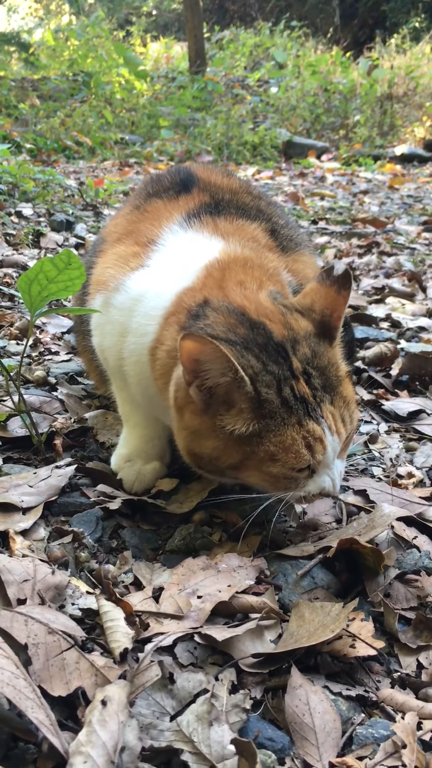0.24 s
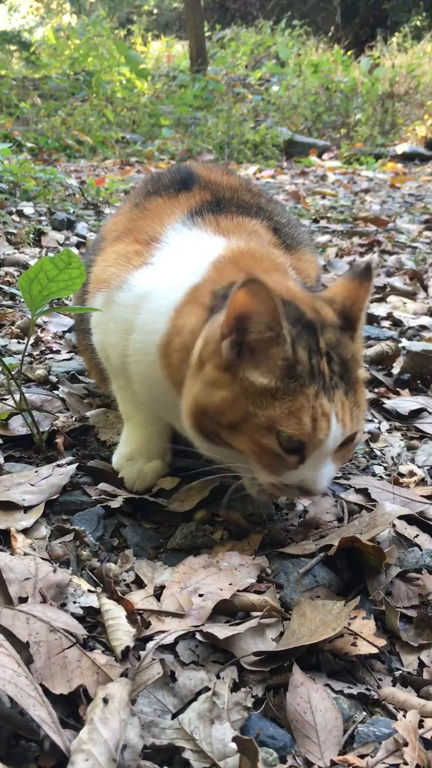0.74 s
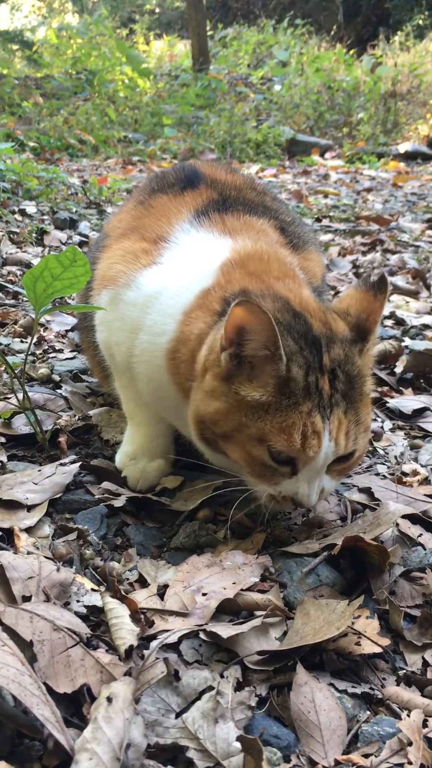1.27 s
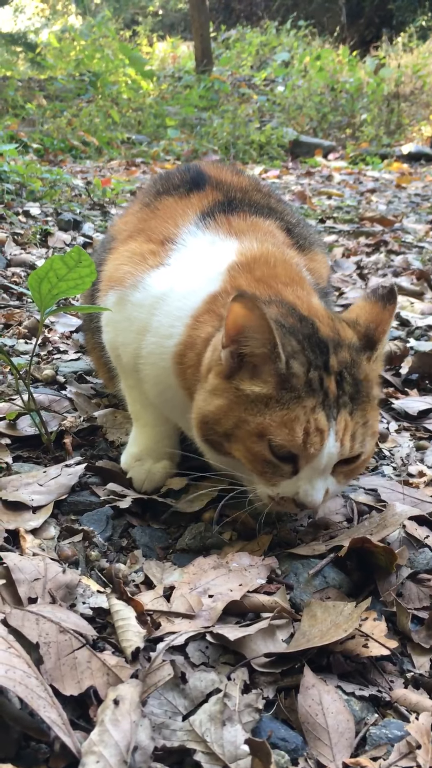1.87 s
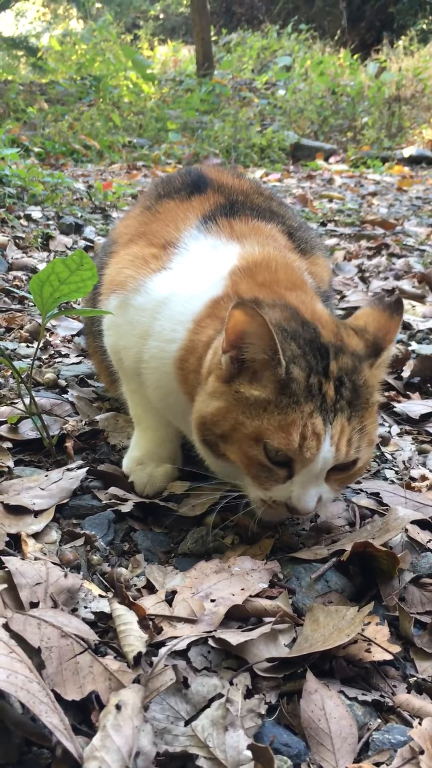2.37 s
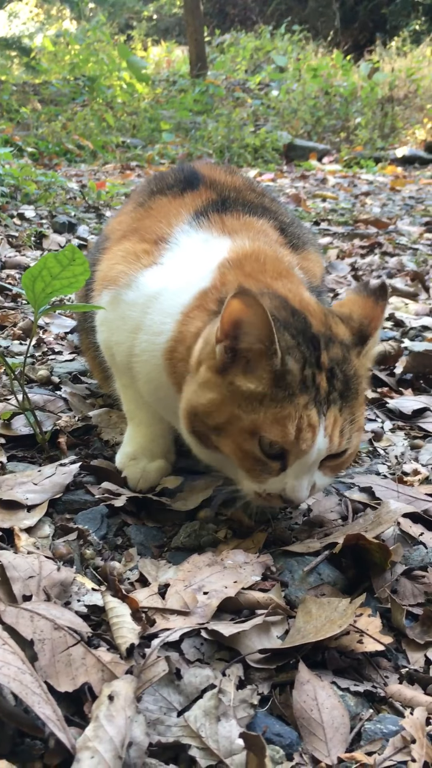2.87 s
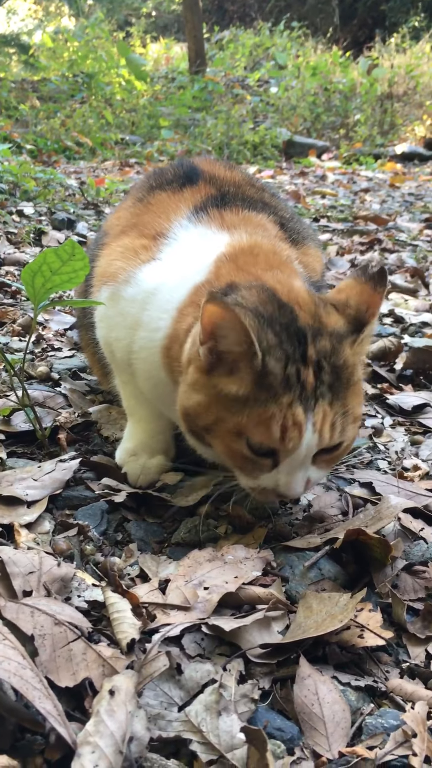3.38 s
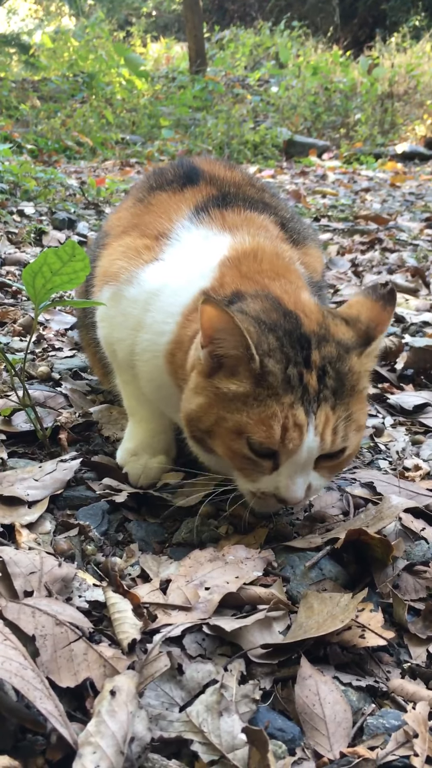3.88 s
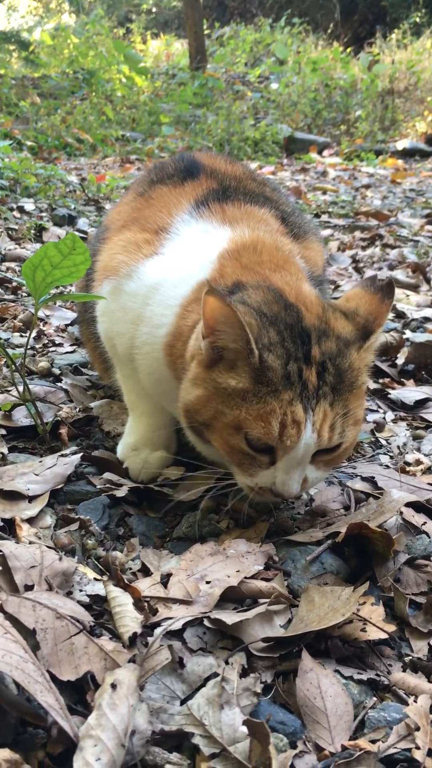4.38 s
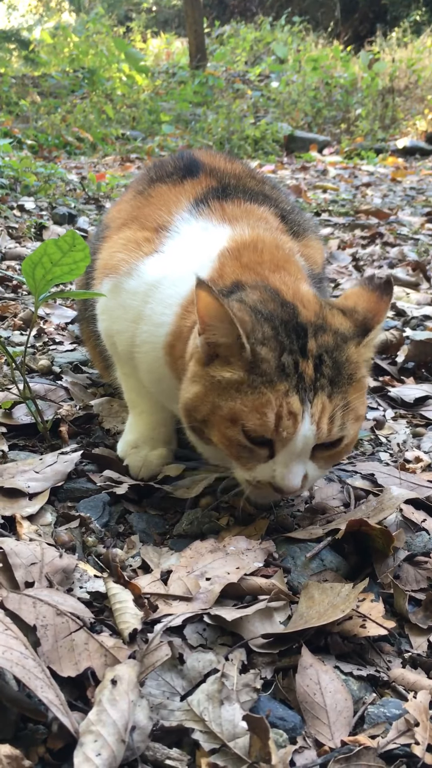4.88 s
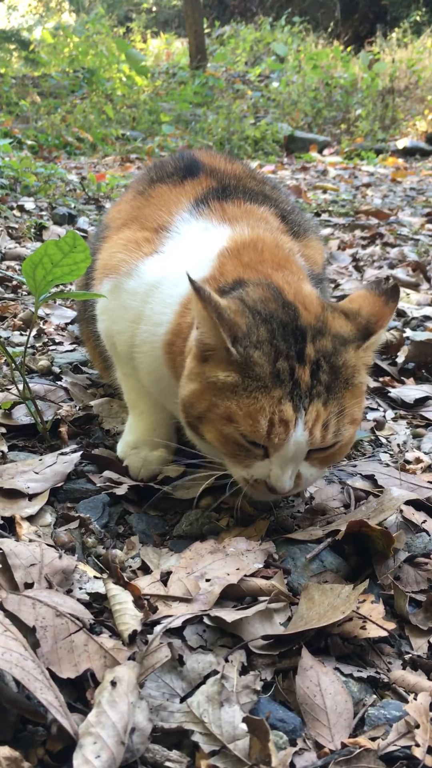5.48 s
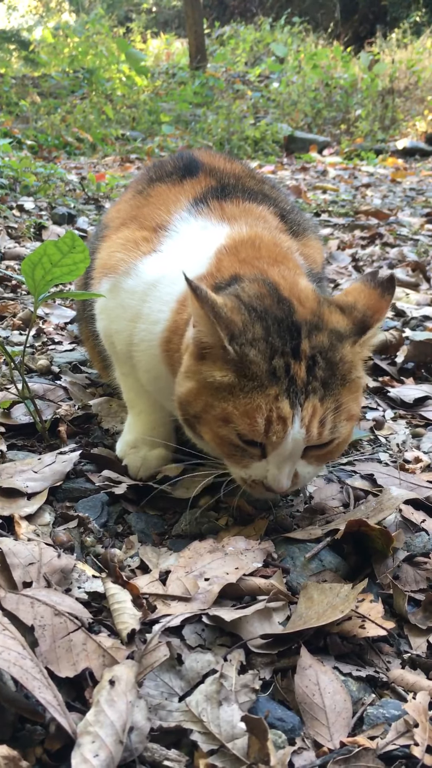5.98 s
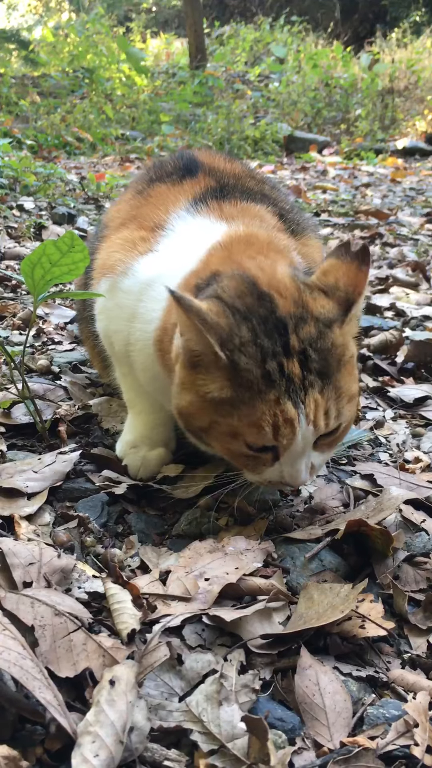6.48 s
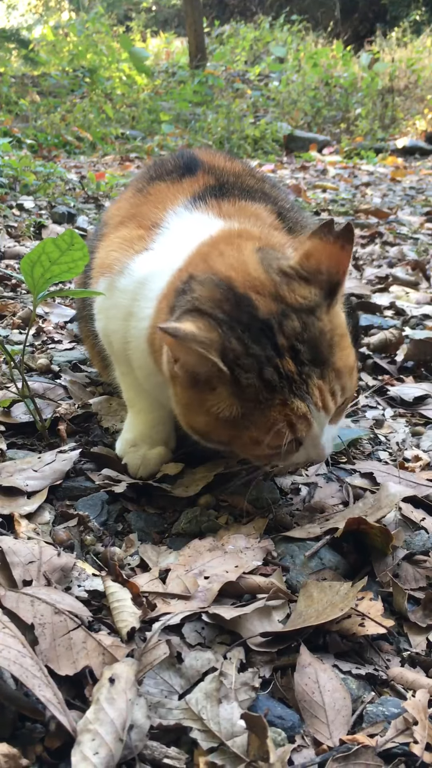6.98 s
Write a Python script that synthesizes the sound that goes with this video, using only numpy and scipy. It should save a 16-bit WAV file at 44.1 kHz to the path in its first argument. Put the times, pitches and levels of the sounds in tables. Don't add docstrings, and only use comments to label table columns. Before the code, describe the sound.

Close, crisp crunching of fish bones in a cat's teeth, with tiny ticks, wet pops, faint hiss and one distant wooden knock.

```python
import sys
import numpy as np
from scipy import signal
from scipy.fft import rfft, irfft
from scipy.io import wavfile

SR = 44100
rng = np.random.default_rng(int(sys.argv[2]) if len(sys.argv) > 2 else 0)


def rack_gain(trim_db):
    fader = np.asarray(trim_db, float)
    return 10 ** (fader / 20)


def dump(signal):
    limited = np.clip(np.atleast_2d(signal).T, -1, 1)
    pcm = np.round(limited * 32767).astype(np.int16)
    wavfile.write(sys.argv[1], SR, pcm)


N = 319224

# start_s [s], thin_splinter_hz [Hz], thick_splinter_hz [Hz], bone_hz [Hz], skull_hz [Hz]
BITES = [(.122, 11600, 6000, 3200, 2720), (1.677, 9300, 6470, 3860, 1640), (2.17, 13600, 9250, 4950, 1790),
         (2.554, 13500, 9500, 4470, 1250), (3.064, 9400, 7300, 4970, 1700),
         (3.524, 13800, 8300, 3780, 1660), (4.03, 13500, 8400, 4230, 2200), (4.53, 13500, 8400, 4670, 1560),
         (4.617, 11650, 8300, 3400, 2580), (4.669, 15000, 8180, 3630, 2670),
         (5.095, 13000, 5600, 4350, 2150), (5.486, 12900, 9730, 4630, 1470),
         (5.526, 12300, 7700, 4280, 2400), (5.912, 12900, 8300, 4360, 2280)]
# start_s [s], thin_splinter_db [dB], thick_splinter_db [dB], bone_db [dB], skull_db [dB]
SNAPS = [(0.122, -7, -7.5, -5.5, -36), (1.6772, -5.5, -4, -12, -15), (2.1631, -40, -12, -22, -32),
         (2.169, -23, -13, -14, -20.5), (2.1734, -40, -20, -21, -37), (2.1752, -18, -12, -17, -21.5),
         (2.5535, -19, -9.5, -19.5, -28), (3.057, -17, -11, -31, -28), (3.0641, -10.5, -13, -21, -31),
         (3.0722, -18, -19, -25, -28.5), (3.524, -20, -17.5, -16, -20), (4.007, -16, -16.5, -26, -39),
         (4.5216, -30, -19, -25, -36), (4.5255, -16, -18, -35, -31), (4.5287, -15, -10, -8.5, -13),
         (4.5394, -20, -16, -16, -21), (4.6163, -18, -15.5, -38, -50), (4.669, -16, -22, -39, -41),
         (5.0908, -13, -13.5, -23, -20), (5.0916, -12, -22, -10.5, -20.5), (5.0959, -21, -19, -17, -20),
         (5.486, -11.5, -21, -13, -20), (5.5253, -13.5, -12.5, -7.5, -13.5), (5.9087, -15, -21, -28, -24)]
# start_s [s], shard_hz [Hz], shard_db [dB], bone_db [dB]
CRACKLES = [(0.136, 11370, -25, -47), (1.6322, 6160, -22, -32), (1.6762, 6120, -18, -33),
            (1.6833, 7540, -31, -35), (1.9532, 6160, -28, -33), (1.9608, 6240, -33, -33),
            (2.1293, 9500, -20, -21), (2.357, 12700, -27, -28), (2.5868, 8830, -31, -28),
            (2.6016, 8900, -22, -39), (3.0002, 6700, -17, -36), (3.0454, 9700, -19, -35),
            (3.0832, 7500, -22, -31), (3.1029, 9470, -24, -25), (4.0426, 11500, -25, -23),
            (4.0488, 5560, -25, -25), (4.052, 9500, -25, -25), (4.0884, 15300, -17, -35),
            (4.499, 13570, -28, -26), (4.5316, 11330, -22, -16), (4.541, 8450, -23, -40),
            (4.6176, 11700, -17, -37), (4.6394, 7750, -24, -39), (4.644, 14770, -25, -39),
            (5.0615, 13000, -17.5, -35), (5.097, 11800, -14, -33), (5.1053, 11330, -19, -30),
            (5.914, 12320, -21, -19), (5.9165, 12000, -20, -33), (5.9067, 12800, -26, -28)]
# start_s [s], ring_hz [Hz], level_db [dB]
TICKS = [(2.102, 12500, -35), (.393, 11370, -30), (.7285, 10980, -30), (5.9485, 13300, -34),
         (1.1247, 13600, -29), (1.2303, 8790, -28), (1.487, 11370, -30), (2.1093, 6460, -30),
         (2.456, 12960, -31), (3.4448, 9100, -29), (3.53, 11200, -22), (3.6088, 11760, -27),
         (4.01, 9000, -25), (5.955, 11800, -30), (4.0459, 10900, -26), (4.0777, 8610, -25),
         (4.107, 11970, -24), (4.3242, 5990, -26), (4.472, 6680, -26), (4.5786, 13520, -27),
         (1.7357, 14700, -35), (4.7133, 11500, -22), (4.8466, 11110, -23), (5.0443, 13440, -28),
         (5.1085, 13740, -27), (5.2838, 13310, -29), (5.446, 13480, -29), (5.538, 13820, -24),
         (6.005, 12500, -25.5), (6.9798, 12000, -33)]
TICK_BONE_DB = -12
# start_s [s], thump_hz [Hz], level_db [dB]
JAW_THUMPS = [(.1223, 516, -17.5), (1.6772, 424, -28), (2.169, 423, -24.5), (2.5537, 500, -30),
              (3.057, 520, -29), (3.5238, 470, -27.5), (4.5287, 329.5, -26), (4.54, 382, -21),
              (5.0917, 380, -23), (5.486, 500, -33), (5.5255, 400, -25.5), (5.9125, 600, -34)]
# start_s [s], ring_hz [Hz],
# level_db [dB]
HOLLOW_POPS = [(3.0456, 1680, -33), (4.0354, 1600, -32), (4.0459, 1360, -26.5), (4.4996, 2580, -26.5),
               (4.5316, 2730, -22.5), (4.5392, 3100, -19.5), (5.0967, 1050, -21), (1.6773, 5480, -6),
               (5.5257, 1600, -15.5), (5.9165, 2200, -21.5), (5.486, 2500, -24), (5.5255, 3700, -15),
               (5.9086, 5200, -18), (4.0488, 2500, -24), (4.0608, 3800, -27), (4.0884, 6200, -27),
               (3.5238, 5000, -25), (5.0917, 8400, -16)]
# start_s [s], length_s [s], ring_hz [Hz], slip_db [dB]
SCRAPES = [
    (1.063, .012, 12000, -36),
    (4.026, .036, 8500, -34.5),
    (4.634, .016, 11000, -29),
    (5.101, .011, 13000, -26),
    (5.998, .006, 13700, -28),
    (6.974, .013, 12800, -36),
]
SLIPS_PER_S, SLIP_HZ_SCATTER, SLIP_SCATTER_DB = 400, .2, 3
SPECK_COUNT, SPECK_SPREAD_S = 60, .12
SPECK_HZ, SPECK_DB, SPECK_SCATTER_DB = (9000, 14500), -38, 2.5
SILENT_DB = -80
# delay_s [s], smear_s [s], level_db [dB]
LEAF_ECHOES = [
    (.0014, 0.0014, -12.5),
    (.0085, 0.00084, -20.5),
]
# time_s [s], level_db [dB]
GRIND = [
    (0.0, -61),
    (1.57, -63),
    (2.08, -58),
    (2.6, -62),
    (4.4, -65),
    (4.7, -61),
    (5.18, -69),
    (5.93, -66),
    (6.11, -82),
    (7.24, -77),
]
KNOCK_S, KNOCK_DB = 1.039, -33.5
# mode_hz [Hz], level_db [dB], t60_s [s]
KNOCK_MODES = [
    (147.4, 0, 0.22),
    (590, -8.5, 0.17),
    (774, 1, 0.11),
    (858, -5, 0.16),
    (1440, -5, 0.11),
]
# freq_hz [Hz], density_db [dB per Hz]
KNOCK_WASH = [(100, 4), (400, -8), (800, -5), (1400, -3), (2200, -10), (3500, -10.5), (4500, -12.5),
              (6000, -31), (9000, -80)]
# freq_hz [Hz], density_db [dB per Hz]
RUMBLE = [(12, -47), (20, -16), (37, -4), (65, 0), (82, -3), (109, -10), (184, -11), (236, -17.5),
          (400, -27), (520, -48), (880, -120)]
RUMBLE_DB, RUMBLE_SWELL_DB, RUMBLE_SWELL_HZ = -54.5, .3, 1.5
# freq_hz [Hz], density_db [dB per Hz]
HISS = [(150, -31), (300, 0.5), (600, -1.5), (1300, 1.5), (2300, -0.5), (3300, 0.5), (6000, 0), (9000, -2),
        (12000, -5.5), (15000, -12.5), (15800, -14)]
HISS_DB, HISS_EDGE_HZ = -52, 15880
# centre_hz [Hz], width_hz [Hz], depth_db [dB]
CASE_DIPS = [
    (4890, 780, -5),
    (7750, 1160, -4),
    (10400, 850, -5.5),
]
EDGE_HZ = 16550


def evened(x, axis=None):
    return x / np.sqrt(np.mean(x ** 2, axis=axis, keepdims=True) + 1e-20)


def read(points, hz):
    f, value = np.transpose(points)
    return np.interp(np.log(hz + 1), np.log(f + 1), value)


def coloured(x, points):
    hz = np.fft.rfftfreq(len(x), 1 / SR)
    return evened(irfft(rfft(x) * rack_gain(read(points, hz)), len(x)))


def ring(hz, centre_hz, width_hz):
    return 1 / (1 + 2j * (hz - centre_hz) / width_hz)


def drift(top_hz):
    hz = np.fft.rfftfreq(N, 1 / SR)
    return evened(irfft(rfft(rng.standard_normal(N)) * np.exp(-(hz / top_hz) ** 2), N))


def below(x, edge_hz):
    return irfft(rfft(x) * (np.fft.rfftfreq(N, 1 / SR) < edge_hz), N)


def cracks(size=1024):
    s, splinter_hz, splinter_db, bone_hz, bone_db, jaw_db = np.transpose(breaks())[:, :, None]
    t, hz = np.arange(size) / SR, np.fft.rfftfreq(size, 1 / SR)

    snap = (t / .0002) ** 2 * np.exp(-t / .0001)
    crumble = rack_gain(-30.) * np.exp(-t / .0025) * (t > .0004)
    force = rfft(rng.standard_normal((len(s), size)) * (snap + crumble))
    force = force / (abs(evened(force, axis=1)) + 0.3)

    bright = ring(hz, splinter_hz, 2200.0) * ring(hz, splinter_hz, 5500.)
    bright = bright + 0.12 * ring(hz, 12300.0, 9700.0)
    bright = bright * hz ** 2 / (hz ** 2 + 3000. ** 2)
    bright = bright * ((hz < HISS_EDGE_HZ - 300) | (splinter_db > -24))
    hollow = ring(hz, bone_hz, 250 + 0.14 * bone_hz) * ring(hz, bone_hz, 1850.0)
    hollow = hollow * hz / (hz + 2000.0)

    late = np.maximum(t - .0012, 0)
    jaw = np.sin(2 * np.pi * bone_hz * late) * np.exp(-late / 0.0035) * np.exp(-(t / 0.0059) ** 2)
    fade = np.exp(-(t / .0013) ** 2) + .25 * np.exp(-(t / .008) ** 2)
    parts = [(irfft(force * bright) * fade, splinter_db),
             (irfft(force * hollow) * fade, bone_db),
             (jaw, jaw_db)]
    sounds = sum(rack_gain(db) * evened(part, axis=1) / np.sqrt(size) for part, db in parts)

    out = np.zeros(N + size)
    np.add.at(out, np.round(s * SR).astype(int) + np.arange(size), sounds)
    echoes = signal.oaconvolve(out, leaf_scatter(t))[:len(out)]
    return (out + echoes)[:N]


def breaks():
    bites, off = np.array(BITES), SILENT_DB

    def piece(s):
        return bites[abs(bites[:, 0] - s).argmin()]

    rows = []
    for s, thin_db, thick_db, bone_db, skull_db in SNAPS:
        _, thin_hz, thick_hz, bone_hz, skull_hz = piece(s)
        rows.append((s, thin_hz, thin_db, bone_hz, bone_db, off))
        rows.append((s, thick_hz, thick_db, skull_hz, skull_db, off))
    rows += [(s, hz, db, piece(s)[3], bone_db, off) for s, hz, db, bone_db in CRACKLES]
    rows += [(s, hz, db, piece(s)[3], db + TICK_BONE_DB, off) for s, hz, db in TICKS]
    rows += [(s, piece(s)[1], off, hz, off, db) for s, hz, db in JAW_THUMPS]
    rows += [(s, piece(s)[1], off, hz, db, off) for s, hz, db in HOLLOW_POPS]

    for start, length, hz, db in SCRAPES:
        slips = round(length * SLIPS_PER_S) + 1
        for place, pitch, size in rng.standard_normal((20, 3))[:slips]:
            s = start + length * (place * 10 % 1)
            slip_hz = min(hz * (1 + SLIP_HZ_SCATTER * pitch), 15000)
            slip_db = db + SLIP_SCATTER_DB * size
            rows.append((s, slip_hz, slip_db, piece(s)[3], slip_db + TICK_BONE_DB, off))

    places, pitches = rng.laplace(size=SPECK_COUNT), rng.random(SPECK_COUNT)
    sizes = rng.standard_normal(SPECK_COUNT)
    for k in range(SPECK_COUNT):
        s = abs(bites[k % len(bites), 0] + SPECK_SPREAD_S * places[k])
        speck_hz = np.interp(pitches[k], [0, 1], SPECK_HZ)
        rows.append((s, speck_hz, SPECK_DB + SPECK_SCATTER_DB * sizes[k], 3000, off, off))
    return rows


def leaf_scatter(t):
    scatter = np.zeros(len(t))
    for delay, smear, db in LEAF_ECHOES:
        puff = np.exp(-((t - delay) / smear) ** 2) * (t > .0006) * rng.standard_normal(len(t))
        scatter += rack_gain(db) * puff / np.linalg.norm(puff)
    return scatter


def grinding():
    sizes = rack_gain(5.4 * np.minimum(rng.exponential(1, N), 4))
    ticks = sizes * (rng.random(N) < 1500. / SR) * rng.choice([-1., 1.], N)
    colour = [(2000, -28), (6000, 2), (11500, 11), (15000, 3), (15800, 5)]  # (Hz, dB)
    level_db = np.interp(np.arange(N) / SR, *np.transpose(GRIND)) - 4.5
    return below(coloured(ticks, colour), HISS_EDGE_HZ) * rack_gain(level_db)


def knock():
    t = np.maximum(np.arange(N) / SR - KNOCK_S, 0)
    rise = 1 - np.exp(-(t / 0.0081) ** 1.6)
    modes = sum(rack_gain(db - 60 * t / t60) * np.sin(2 * np.pi * hz * t) for hz, db, t60 in KNOCK_MODES)
    decay = rack_gain(-3.0 - 60 * t / 0.14) + rack_gain(-11.0 - 60 * t / 0.9)
    wash = coloured(rng.standard_normal(N), KNOCK_WASH) * decay
    wash = wash * rack_gain(1.2 * drift(80.))
    return rack_gain(KNOCK_DB) * rise * (modes + wash)


def background():
    rumble_db = RUMBLE_DB + RUMBLE_SWELL_DB * drift(RUMBLE_SWELL_HZ)
    rumble = coloured(rng.standard_normal(N), RUMBLE) * rack_gain(rumble_db)
    hiss = coloured(rng.standard_normal(N), HISS) * rack_gain(HISS_DB + 0.2 * drift(5.4))
    return rumble + below(hiss, HISS_EDGE_HZ)


def scene():
    return np.tile(cracks() + grinding() + knock() + background(), (2, 1))


def microphone(dry):
    hz = np.fft.rfftfreq(N, 1 / SR)
    dips_db = sum(db * abs(ring(hz, f, w)) ** 2 for f, w, db in CASE_DIPS)
    passband = hz ** 4 / (hz ** 4 + 25 ** 4) / (1 + (hz / EDGE_HZ) ** 80)
    return irfft(rfft(dry) * rack_gain(dips_db) * passband, N)


def side_shimmer(x):
    hz, t, z = signal.stft(x, SR, nperseg=2048, noverlap=1024)
    band = np.searchsorted([4100, 5200, 6900, 8300, 9600, 11000, 12400, 13800, 15800], hz)
    apart = (rng.random((10, len(t))) < .22) & (rng.random(len(t)) < .17)
    apart[[0, 9]] = False
    level = rack_gain(-1.) * np.median(abs(z), axis=1, keepdims=True)
    noise = level * apart[band] * np.exp(2j * np.pi * rng.random(z.shape))
    side = signal.istft(noise, SR, nperseg=2048, noverlap=1024)[1][:N]
    return np.roll(side, 228) * np.array([[1], [-1]])


def roll_off(x):
    return signal.sosfilt(signal.butter(12, 17010, fs=SR, output="sos"), x)


def record(dry):
    x = microphone(dry)
    mix = x + side_shimmer(x[0])
    return roll_off(mix)


dry = scene()
out = record(dry)
dump(out)
```